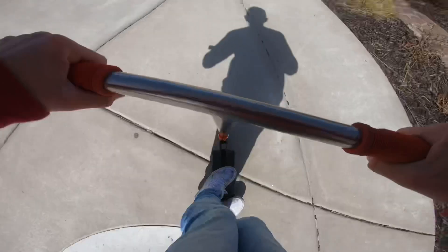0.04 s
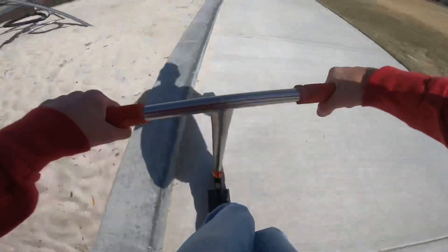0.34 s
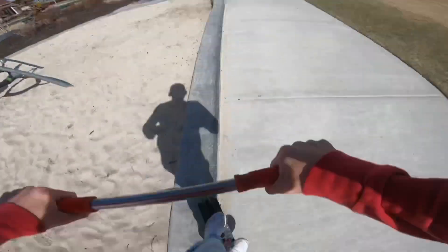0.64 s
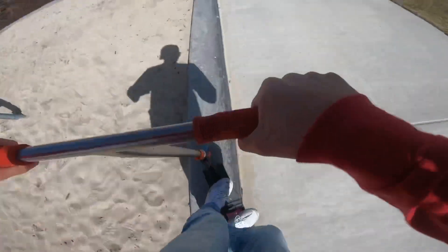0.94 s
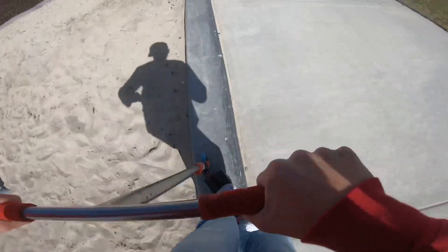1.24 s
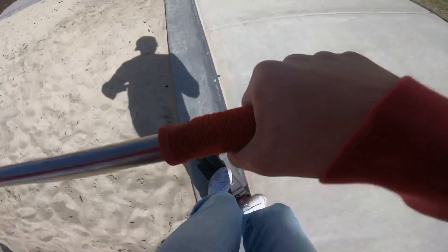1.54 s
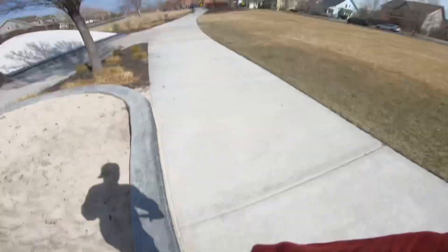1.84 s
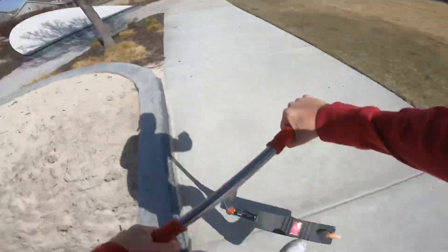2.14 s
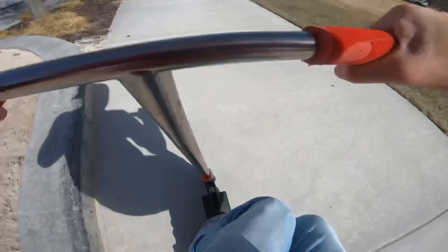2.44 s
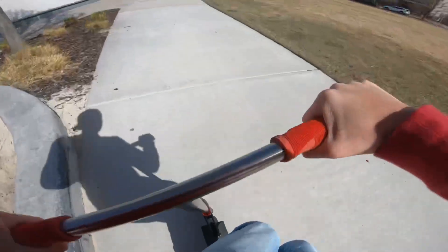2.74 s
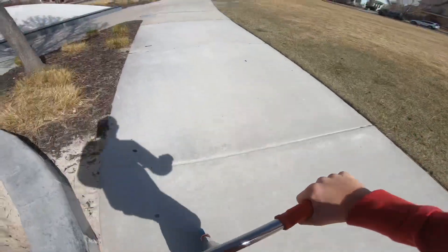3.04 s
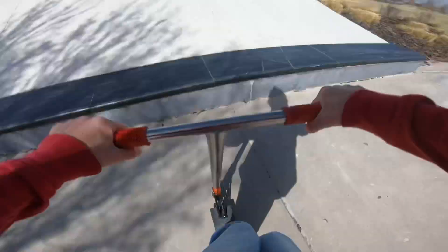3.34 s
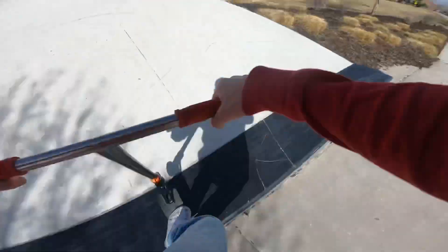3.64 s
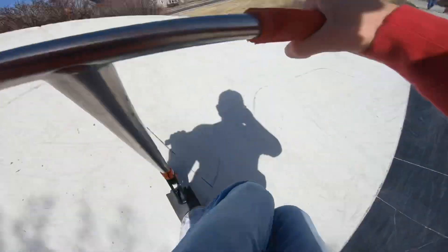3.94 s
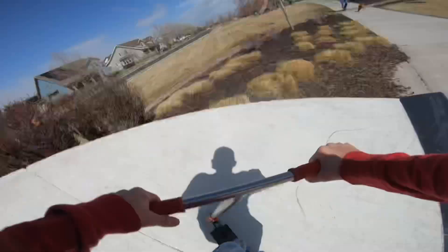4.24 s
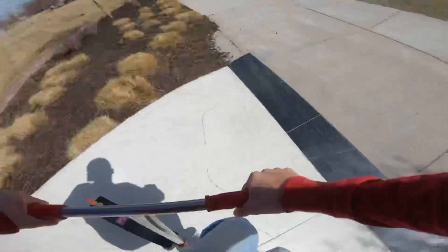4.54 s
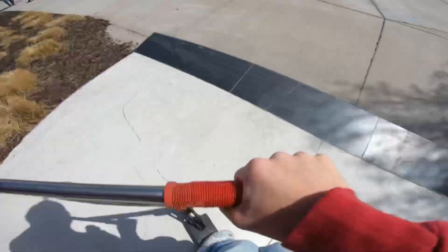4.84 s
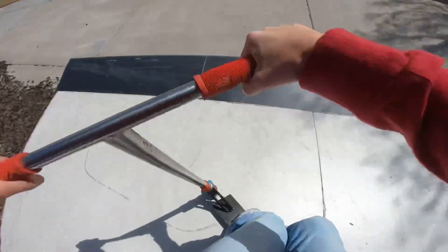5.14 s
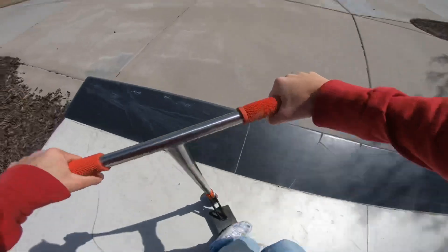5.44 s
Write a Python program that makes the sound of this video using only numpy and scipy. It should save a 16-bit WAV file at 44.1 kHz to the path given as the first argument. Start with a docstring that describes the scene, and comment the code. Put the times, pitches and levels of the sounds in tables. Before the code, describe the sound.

Heard from a microphone on the rider's chest in open air, gusts of wind rumble over the low whirr of scooter wheels on concrete. The deck edge bites a kerb and scrapes with a short metallic ring, then the bar and deck clack irregularly, twice loudly. Close sleeve rustles, small plastic clicks and dull bumps come in between. A brief wavering wind whistle comes near the end, and the sound cuts out three times for an instant.

```python
"""Stunt scooter on concrete, from the rider's chest.

The scooter rolls over a path and up a ramp, in open air; the microphone is in a chest-worn camera.
Below it, wheels whirr and crunch grit, bearings hiss, the deck grinds along a kerb, and seams and
landings clack through bar and deck. Right at the microphone, sleeves brush and rasp, the mount ticks,
and wind buffets in gusts and whistles once across the port. Three times the sound drops out."""
import sys
import numpy as np
from scipy import signal
from scipy.fft import rfft, irfft, next_fast_len
from scipy.io import wavfile
from scipy.ndimage import uniform_filter1d, map_coordinates

SR = 44100
rng = np.random.default_rng(int(sys.argv[2]) if len(sys.argv) > 2 else 0)


def digitize_waveform(pressure):
    """Quantize a signal to 16-bit integers and store it at the path in sys.argv[1].

    Rows of a 2-D input are taken as channels; values are limited to [-1, 1].
    """
    field = np.atleast_2d(pressure).T
    bounded = np.clip(field, -1, 1)
    quanta = np.round(bounded * 32767).astype(np.int16)
    wavfile.write(sys.argv[1], SR, quanta)


N = 251348

# Levels in the tables are relative, ahead of each source's own gain.
# how hard the wheels press on the concrete: time_s, level_db
WHEEL_PRESSURE = [(0.0, -48.5), (0.7, -46), (0.9, -35.5), (1.5, -41.5), (1.85, -41), (2.0, -56.5),
                  (2.63, -52.5), (2.76, -49), (3.1, -51), (3.3, -46), (3.93, -50), (4.2, -45),
                  (4.44, -52.5), (5.2, -54.5), (5.5, -43), (5.69, -50)]
# smooth whirr of the tyres: freq_hz, level_db
WHIRR_SPECTRUM = [(200, 14), (600, 22.5), (1200, 5.5), (2400, -2), (3400, -3), (4550, -19), (5100, -29.5),
                  (12000, -47.5)]
# grit under the wheels: freq_hz, level_db
GRIT_SPECTRUM = [(150, -3.5), (500, -3.5), (1200, -6.5), (2300, -10.5), (4200, -16.5), (7300, -36),
                 (10000, -33.5), (15000, -80.5)]
# wheels striking seams and landing, plus two faint dull knocks near 3.9 s: time_s, bar_db, deck_db,
# brightness_hz, deck_pitch_hz
WHEEL_BLOWS = [(0.17, -33.5, -33.5, 920, 384), (0.821, -19, -31.5, 860, 560), (1.518, -23.5, -54, 573, 900),
               (2.1, -21, -29.5, 1260, 490), (2.169, -11, -19.5, 1200, 337), (2.183, -23, -26.5, 950, 425),
               (3.672, -20.5, -22, 980, 676), (3.758, -33, -31.5, 670, 366), (3.789, -22, -25, 713, 357),
               (3.86, -41, -36.5, 400, 360), (3.974, -39, -40, 800, 400), (4.694, -23.5, -28, 900, 630),
               (4.731, -11, -17.5, 550, 350)]
# resonances of bar, fork and wheel cores: pitch_hz, width_hz, level_db
BAR_MODES = [(625, 240, 6), (1214, 270, 11), (1323, 224, 7.5), (1758, 230, 3.5), (2330, 560, -3),
             (2970, 490, -1.5), (3700, 290, -3)]
# resonances of the deck under the rider's weight: pitch_hz, level_db, t60_s
DECK_MODES = [(205, 8, 0.034), (362, 3.5, 0.064), (560, 2, 0.044), (644.6, -4, 0.11), (957, -22, 0.0087)]
# the deck's metal edge dragging on concrete: start_s, length_s, level_db
GRIND_STROKES = [(1.04, 0.47, -34), (2.135, 0.032, -38), (4.708, 0.032, -38)]
# the deck edge catching on the kerb: time_s, peak_db
KERB_CATCHES = [(0.648, -13.5), (0.667, -13), (0.705, -15.5), (0.774, -29), (0.909, -33.5), (0.956, -30),
                (1.044, -27), (1.091, -23.5), (1.126, -27), (1.157, -30), (1.181, -20.5), (1.318, -35.5),
                (1.464, -32)]
# resonances of the deck edge: pitch_hz, width_hz, level_db
EDGE_MODES = [(581, 28, 4), (1134, 41, -1), (1866, 98, 4.5), (2184, 74, 3), (2360, 31, 5), (2960, 100, -7),
              (3720, 52, -8.5), (4400, 20, -4.5)]
# concrete crushed by the deck edge: freq_hz, level_db
CRUSH_SPECTRUM = [(300, -6), (1100, 3), (4200, -5), (6800, -21.5), (13000, -53.5)]
# the loose steering column knocking: time_s, peak_db
COLUMN_KNOCKS = [(3.381, -32), (3.399, -27.5), (4.118, -27.5), (4.128, -27), (4.224, -33.5), (4.362, -28.5),
                 (4.384, -38), (4.501, -41), (4.561, -32), (4.573, -23.5)]
# resonances of a small steel part: pitch_hz, level_db, t60_s
CLINK_MODES = [(2830, 2, 0.017), (3930, -12, 0.014)]
# wheels skidding sideways: peak_s, length_s, level_db
SKID_SWELLS = [(0.34, 0.2, -48.5), (4.6, 0.025, -43), (4.835, 0.16, -40)]
# resonances of a skidding tyre: pitch_hz, width_hz, level_db
TYRE_MODES = [(1250, 650, 14), (2470, 3800, -8.5)]
# a wheel spinning on its bearings: start_s, length_s, level_db
WHEEL_SPINS = [(2.69, 0.2, -61.5), (4.98, 0.69, -66.5)]
# resonances of the bearing races: pitch_hz, width_hz, level_db
RACE_MODES = [(3030, 700, 2.5), (3850, 700, 3), (4550, 410, 0), (6980, 250, -5), (9000, 400, -8.5)]

# a sleeve brushing the camera: peak_s, length_s, level_db
SLEEVE_BRUSHES = [(0.655, 0.043, -33), (1.705, 0.17, -35), (2.19, 0.37, -51), (3.41, 0.12, -49),
                  (3.655, 0.17, -48), (4.02, 0.12, -52.5), (4.17, 0.25, -38.5), (4.595, 0.09, -51.5),
                  (4.87, 1, -63)]
# hiss of rubbing cloth: freq_hz, level_db
CLOTH_SPECTRUM = [(590, -7.5), (1050, -8.5), (1390, -13), (2060, -7), (4390, -7), (5100, -17), (6120, -15),
                  (9040, -30), (10600, -22.5), (15000, -51)]
# a cuff dragging on the mount: start_s, length_s, level_db
CUFF_DRAGS = [(1.762, 0.015, -40.5), (1.838, 0.028, -41.5), (4.276, 0.014, -38.5)]
# small hard parts ticking by the camera: time_s, peak_db, brightness_hz
MOUNT_TICKS = [(0.536, -25, 9000), (1.8677, -22.5, 8130), (1.931, -34, 4000), (1.946, -29.5, 14100),
               (2.2704, -33.5, 2940), (2.347, -28, 3000), (3.4353, -24, 4870), (3.487, -31.5, 8500),
               (3.657, -28, 4870), (3.7998, -33, 5000), (4.224, -36.5, 5800), (4.2756, -30, 5930),
               (4.802, -37, 8950), (4.987, -28.5, 2900)]
# resonances of the well-damped plastic mount: pitch_hz, width_hz, level_db
MOUNT_MODES = [(1600, 700, 1), (2880, 220, 11), (3950, 330, 7.5), (6300, 1100, -6), (8700, 1000, -6)]
# dull bumps of the camera body: start_s, peak_db, pitch_hz
CAMERA_BUMPS = [(1.72, -19.5, 49), (1.864, -17.5, 39.3), (2.172, -11.5, 116), (2.342, -14, 51),
                (3.416, -16.5, 83), (3.482, -18, 66), (3.708, -17, 114), (3.792, -12, 235),
                (4.22, -18.5, 92), (4.362, -18, 56), (4.816, -16, 98), (5.497, -12, 306), (5.677, -8, 427)]

# slow pressure of the wind on the microphone: time_s, level_db
WIND_PRESSURE = [(0.16, -35), (0.26, -27), (0.5, -35.5), (0.63, -27.5), (1.35, -37.5), (2.15, -31.5),
                 (2.41, -46), (2.62, -40), (2.76, -32), (3.3, -37.5), (3.75, -33), (4.03, -39.5),
                 (4.25, -29), (4.67, -41), (4.9, -25), (5.02, -61.5), (5.69, -39)]
# rumble of that pressure: freq_hz, level_db
BUFFET_SPECTRUM = [(12, -28.5), (30, 0.5), (115, -2.5), (180, -11.5), (300, -20.5), (2000, -86.5)]
# gusts of turbulence at the port: peak_s, length_s, level_db, upper_edge_hz
PORT_GUSTS = [(0.007, 0.19, -35.5, 990), (0.305, 0.26, -34, 950), (0.39, 0.34, -31.5, 1060),
              (0.616, 0.24, -29, 696), (0.84, 0.73, -34.5, 806), (1.148, 0.22, -35.5, 714),
              (1.595, 1, -43.5, 673), (2.133, 0.026, -31.5, 580), (2.317, 0.19, -31.5, 700),
              (2.482, 0.23, -36.5, 570), (2.695, 0.14, -36, 530), (2.893, 0.38, -36.5, 743),
              (3.425, 0.15, -24.5, 760), (3.73, 0.34, -38, 610), (4.197, 0.14, -28.5, 745),
              (4.834, 0.28, -36.5, 728)]
# eddies whose upper edge lies at EDDY_EDGE_HZ: freq_hz, level_db
EDDY_SPECTRUM = [(90, -3), (400, 1.5), (800, -4), (1020, -9), (1350, -18.5), (3300, -38), (11000, -91.5)]
EDDY_EDGE_HZ = 1000
# air speed across the port, heard as pitch: time_s, pitch_hz
WHISTLE_PITCH = [(4.98, 411.6), (5.08, 425), (5.22, 370.5), (5.285, 492.4), (5.345, 515.5), (5.396, 641),
                 (5.435, 670.6), (5.505, 568), (5.57, 360)]
# rush of air around the whistle: freq_hz, level_db
RUSH_SPECTRUM = [(250, -27), (600, 13.5), (900, 2), (1200, 4), (1700, -1), (2300, -20.5), (4800, -31.5),
                 (5500, -41), (12000, -48)]
# treble loss through the camera housing: freq_hz, gain_db
HOUSING_RESPONSE = [(9000, 0.5), (11000, -8), (15500, -13.5)]
# brief silences: start_s, end_s
DROPOUTS = [(0.188, 0.233), (3.143, 3.217), (5.572, 5.618)]


def wheels(frame_db=-5, grit_db=-3, whirr_db=-1, bumpy_db=3.5, chatter_db=-27, bite_db=-46):
    """Light rolling whirrs; past the bite level and after hard blows, grit crunches and shakes the frame."""
    jolts = [(s, 0, bar_db + chatter_db) for s, bar_db, *_ in WHEEL_BLOWS]
    chatter = strokes(jolts, attack_s=0.0065, sag_db_per_s=1, release_s=0.0054)
    press = np.hypot(amp(curves(WHEEL_PRESSURE)[0]), chatter)
    grit_share = press ** 4 / (press ** 4 + amp(bite_db) ** 4)
    load = amp(bumpy_db * wobble(80))
    frame = unit(ringing(load * grains(rate=900, spread_db=2), BAR_MODES))
    crunch = grains(rate=8000, spread_db=2.5)
    grit = raspy(coloured(load * crunch, GRIT_SPECTRUM), depth_db=-1)
    whirr = raspy(coloured(rng.standard_normal(N), WHIRR_SPECTRUM), depth_db=7.5)
    rough = amp(frame_db) * frame + amp(grit_db) * grit
    return press * (np.sqrt(grit_share) * rough + np.sqrt(1 - grit_share) * amp(whirr_db) * whirr)


def clacks(bar_gain_db=4, deck_gain_db=9, crack_db=-22, rattle_db=-23, scuff_db=-21, hardness=3.56):
    """A wheel scuffs an edge and strikes it: the bar rings and rattles, the deck knocks."""
    out, t = np.zeros(N), np.arange(SR // 6) / SR
    for s, bar_db, deck_db, bright_hz, deck_hz in WHEEL_BLOWS:
        force = contact(t, t60=0.0088) * (1 - np.exp(-t / 0.0088))
        force += amp(rattle_db) * contact(t, t60=0.036)
        # a softer contact gives a duller clack
        force = filtered(force, lambda hz: 1 / (1 + 1j * hz / (hardness * bright_hz)) ** 2)
        add(out, s, ringing(force, struck(BAR_MODES)) + amp(crack_db) * force, bar_db + bar_gain_db)
        scuff = ringing(contact(t, t60=0.09)[::-1], BAR_MODES)  # swells into the blow
        add(out, s - t[-1], scuff, bar_db + scuff_db)
        add(out, s, deck_knock(t, deck_hz), deck_db + deck_gain_db)
    return out


def deck_knock(t, centre_hz, reach_octaves=0.75, attack_s=0.0012):
    """Where the blow lands decides which deck modes speak: those near centre_hz are favoured."""
    knock = 0
    for hz, db, t60 in DECK_MODES:
        weight = 1 / (1 + (np.log2(hz / centre_hz) / reach_octaves) ** 2)
        turns = hz * rng.normal(1, 0.023) * t + rng.random()
        knock += weight * amp(db - 60 * t / t60) * np.sin(2 * np.pi * turns)
    return knock * (1 - np.exp(-t / attack_s))


def deck_grind(crunch_db=-7, shift_db=5, chips_per_s=110, crumble_t60_s=0.016):
    """The metal edge scrapes kerb and ramp, crushes stone and sings in modes that trade strength."""
    drag = strokes(GRIND_STROKES, attack_s=0.017, sag_db_per_s=16, release_s=0.0053)
    slips = grains(rate=1500, spread_db=2)
    chips = (rng.random(N) < chips_per_s / SR) * rng.uniform(0.5, 1, N)
    crumble = amp(-60 * np.arange(SR // 20) / SR / crumble_t60_s)
    crushed = unit(signal.fftconvolve(chips, crumble)[:N] * rng.standard_normal(N))
    song = sum((-1) ** k * ringing(slips + crushed, [mode]) * amp(shift_db * wobble(19))
               for k, mode in enumerate(EDGE_MODES))
    crunch = raspy(coloured(crushed, CRUSH_SPECTRUM), depth_db=5.5)
    return drag * (unit(song) + amp(crunch_db) * crunch)


def kerb_catches(gain_db=2, crack_db=-3):
    """The deck edge bites into the kerb: concrete cracks and the metal rings briefly."""
    out, t = np.zeros(N), np.arange(SR // 12) / SR
    for s, db in KERB_CATCHES:
        force = contact(t, t60=0.019) * (1 - np.exp(-t / 0.012))
        crack = filtered(force, lambda hz: shape(CRUSH_SPECTRUM, hz))
        add(out, s, ringing(force, struck(EDGE_MODES)) + amp(crack_db) * crack, db + gain_db)
    return out


def column_rattles(cutoff_hz=2200):
    """The steering column knocks in its play and lightly jolts the bar."""
    out, t = np.zeros(N), np.arange(SR // 20) / SR
    for s, db in COLUMN_KNOCKS:
        force = filtered(contact(t, t60=0.043), lambda hz: 1 / (1 + 1j * hz / cutoff_hz))
        add(out, s, ringing(force, BAR_MODES), db)
    return out


def steel_clink(start_s=2.349, peak_db=-22):
    """Steel touches steel once: a short, clear ring."""
    out, t = np.zeros(N), np.arange(SR // 10) / SR
    ring = sum(amp(db - 60 * t / t60) * np.sin(2 * np.pi * hz * t) for hz, db, t60 in CLINK_MODES)
    add(out, start_s, ring, peak_db)
    return out


def skids(gain_db=1, cutoff_hz=3500):
    """A soft tyre sticks and slips sideways: a dull, rough scuff."""
    slips = grains(rate=2000, spread_db=1)
    scuff = filtered(ringing(slips, TYRE_MODES), lambda hz: 1 / (1 + (hz / cutoff_hz) ** 2))
    return amp(gain_db) * swells(SKID_SWELLS, rise=0.47, curve=2.35) * unit(scuff)


def bearings():
    """Balls whirr in the races of a spinning wheel: a soft, slowly fading hiss in steep-sided bands."""
    spin = strokes(WHEEL_SPINS, attack_s=0.04, sag_db_per_s=6.5, release_s=0.039)
    balls = grains(rate=9000, spread_db=1)
    return spin * unit(ringing(ringing(balls, RACE_MODES), RACE_MODES))


def sleeves(gain_db=3, rest_db=-86):
    """A sleeve brushes right at the microphone: fibres catch and slip as fine hiss with sharper snags."""
    brush = swells(SLEEVE_BRUSHES, rise=0.58, curve=1.25) + amp(rest_db)
    fibres = grains(rate=8800, spread_db=-2.5) * amp(2.85 * wobble(290))
    snags = 0.25 * grains(rate=90, spread_db=1)
    return amp(gain_db) * brush * raspy(coloured(fibres + snags, CLOTH_SPECTRUM), depth_db=3)


def cuff_rasps():
    """Cloth sticks and slips on the mount: short bursts of coarse grains in its upper resonances."""
    drag = strokes(CUFF_DRAGS, attack_s=0.0066, sag_db_per_s=51, release_s=0.015)
    slips = grains(rate=3000, spread_db=3)
    return drag * unit(ringing(slips, MOUNT_MODES[2:]))


def mount_ticks(gain_db=4, rattle_db=-24, crack_db=-16):
    """The mount clicks close to the microphone as the rider moves: a dry crack and a short ring."""
    out, t = np.zeros(N), np.arange(SR // 20) / SR
    for s, db, bright_hz in MOUNT_TICKS:
        force = contact(t, t60=0.015) * (1 - np.exp(-t / 0.0013))
        force += amp(rattle_db) * contact(t, t60=0.13)
        force = filtered(force, lambda hz: 1 / (1 + 1j * hz / bright_hz))
        add(out, s, ringing(force, struck(MOUNT_MODES)) + amp(crack_db) * force, db + gain_db)
    return out


def camera_bumps(gain_db=-1, width_cycles=0.41):
    """A soft push swings the camera for a cycle or two."""
    out, t = np.zeros(N), np.arange(SR // 6) / SR
    for s, db, hz in CAMERA_BUMPS:
        turns = hz * t
        swing = turns ** 2 * np.exp(-np.sqrt(2) * turns / width_cycles)
        add(out, s, -np.sin(2 * np.pi * turns) * swing, db + gain_db)
    return out


def wind_buffeting(gain_db=-1, gust_db=-9, flutter_db=3.26):
    """Slow pressure swings rumble on the microphone; each gust adds to them."""
    gusts = swells([row[:3] for row in PORT_GUSTS], rise=0.39, curve=1.8)
    pressure = np.hypot(amp(curves(WIND_PRESSURE)[0]), amp(gust_db) * gusts)
    flutter = amp(gain_db + flutter_db * wobble(22))
    return pressure * flutter * coloured(rng.standard_normal(N), BUFFET_SPECTRUM)


def wind_eddies(gain_db=3.5, flutter_db=2.3, rise=0.44, curve=1.6, sag_octaves=1.51):
    """Each gust sheds a band of eddies that climbs as the air speeds up and falls as it slows."""
    hz, t, noise = signal.stft(rng.standard_normal(N), SR, nperseg=512)
    power = 0
    for s, length, db, peak_edge_hz in PORT_GUSTS:
        distance = from_peak(t - s, length, rise)
        edge_hz = peak_edge_hz / 2 ** (sag_octaves * np.minimum(distance, 1))
        colour = shape(EDDY_SPECTRUM, hz[:, None] * EDDY_EDGE_HZ / edge_hz) ** 2
        power += swell_power(distance, db, curve) * colour / colour.mean(axis=0)
    eddies = signal.istft(noise * np.sqrt(power), SR, nperseg=512)[1][:N]
    return amp(gain_db + flutter_db * wobble(60)) * eddies


def port_whistle(waver=0.0256, flutter_db=1.5, tone_db=-23, rush_db=-22):
    """Air sheds vortices at the port: an unsteady tone in a broader rush, both louder as pitch climbs."""
    pitch, = curves(WHISTLE_PITCH)
    t = np.arange(N) / SR
    blowing = uniform_filter1d(1. * ((t > WHISTLE_PITCH[0][0]) & (t < WHISTLE_PITCH[-1][0])), size=1024)
    wavering_hz = pitch + waver * pitch.max() * wobble(220)
    phase = 2 * np.pi * np.cumsum(wavering_hz) / SR
    tone = unit(np.sin(phase) * amp(flutter_db * wobble(110)))
    rush = coloured(rng.standard_normal(N), RUSH_SPECTRUM)
    octaves = np.log2(pitch / pitch.max())  # the tone loses 50 dB per octave down, the rush 54
    return blowing * (amp(tone_db + 50 * octaves) * tone + amp(rush_db + 54 * octaves) * rush)


def raspy(x, depth_db):
    """Narrow resonances that come and go as a rubbing contact moves."""
    spectra = signal.stft(x, nperseg=1024)[2]
    patches = uniform_filter1d(rng.standard_normal(spectra.shape), size=5, axis=0)  # across frequency
    patches = uniform_filter1d(patches, size=6, axis=1)  # across time
    return unit(signal.istft(spectra * amp(depth_db * unit(patches)), nperseg=1024)[1][:N])


def struck(modes, detune=0.06, scatter_db=2):
    """A body's resonances as one blow finds them: each blow lands on a slightly different spot."""
    return [(hz * rng.normal(1, detune), width, db + rng.normal(0, scatter_db))
            for hz, width, db in modes]


def strokes(rows, attack_s, sag_db_per_s, release_s):
    """Gain of (start_s, length_s, level_db) strokes: attack, a sagging hold, release."""
    t, gain = np.arange(N) / SR, 0
    for s, length, db in rows:
        attack = np.clip((t - s) / attack_s, 0, 1)
        hold = amp(db - sag_db_per_s * np.maximum(t - s, 0))
        release = np.exp(-np.maximum(t - s - length, 0) / release_s)
        gain += attack * hold * release
    return gain


def swells(rows, rise, curve):
    """Gain of (peak_s, length_s, level_db) swells, added in power."""
    t = np.arange(N) / SR
    return np.sqrt(sum(swell_power(from_peak(t - s, length, rise), db, curve) for s, length, db in rows))


def swell_power(distance, peak_db, curve):
    """Power of one swell, 20 dB down at distance 1 from its peak."""
    return amp(peak_db - 20 * np.minimum(distance ** curve, 10)) ** 2


def from_peak(t, length, rise):
    """Distance from a swell's peak at t = 0, 1 at both ends; rise is the share before the peak."""
    return np.maximum(-t / rise, t / (1 - rise)) / length


def amp(db):
    """Decibels to gain."""
    return 10 ** (np.asarray(db) / 20)


def unit(x):
    """Scale to rms 1."""
    return x / np.sqrt(np.mean(x ** 2) + 1e-20)


def shape(points, hz):
    """Gain of (Hz, dB) points on a log axis."""
    f, db = np.transpose(points)
    return amp(np.interp(np.log(hz + 1), np.log(f + 1), db))


def curves(rows):
    """One value per sample for each column after the time."""
    s, *cols = np.transpose(rows)
    return [np.interp(np.arange(N) / SR, s, c) for c in cols]


def wobble(rate):
    """A smooth random curve, rate knots a second."""
    return map_coordinates(rng.standard_normal(int(N * rate / SR) + 4), [np.arange(N) * rate / SR])


def filtered(x, response):
    """x times a response of frequency."""
    size = next_fast_len(len(x) + 8192)
    return irfft(rfft(x, size) * response(np.fft.rfftfreq(size, 1 / SR)), size)[:len(x)]


def coloured(x, points):
    """x with the given spectrum, at rms 1."""
    return unit(filtered(x, lambda hz: shape(points, hz)))


def ringing(x, modes):
    """x through the resonances of a body."""
    return filtered(x, lambda f: sum((-1) ** k * amp(db) * 1j * f * w / (c * c - f * f + 1j * f * w)
                                     for k, (c, w, db) in enumerate(modes)))


def grains(rate, spread_db):
    """Random tiny impacts of uneven size, rms 1."""
    return unit((rng.random(N) < rate / SR) * rng.standard_normal(N)
                * amp(spread_db * rng.standard_normal(N)))


def contact(t, t60):
    """A short rough contact force."""
    return rng.standard_normal(len(t)) * amp(-60 * t / t60)


def add(track, s, sound, db):
    """Mix a sound in at time s with the given peak level."""
    part = track[max(round(s * SR), 0):][:len(sound)]
    part += (amp(db) * sound / np.abs(sound).max())[:len(part)]


def scene():
    """Everything reaches the one chest microphone directly, in open air."""
    wind = wind_buffeting() + wind_eddies() + port_whistle()
    scooter = wheels() + skids() + bearings() + deck_grind()
    knocks = kerb_catches() + clacks() + column_rattles() + steel_clink()
    handling = sleeves() + cuff_rasps() + mount_ticks() + camera_bumps()
    return (scooter + knocks + handling + wind)[None]


def record(dry, ceiling=0.52, top_hz=15800):
    """The housing dulls the treble, the hardest blows are rounded off, and the sound drops out."""
    t = np.arange(N) / SR
    live = 1. - sum((t > start) & (t < end) for start, end in DROPOUTS)
    dulled = filtered(dry[0], lambda hz: shape(HOUSING_RESPONSE, hz))
    rounded = dulled / (1 + (dulled / ceiling) ** 4) ** 0.25
    return filtered(rounded * uniform_filter1d(live, size=32), lambda hz: hz < top_hz)[None]


dry = scene()
out = record(dry)
digitize_waveform(out)
```